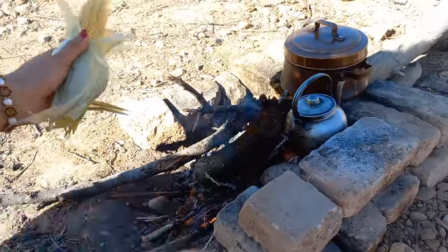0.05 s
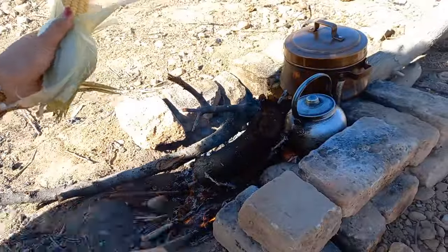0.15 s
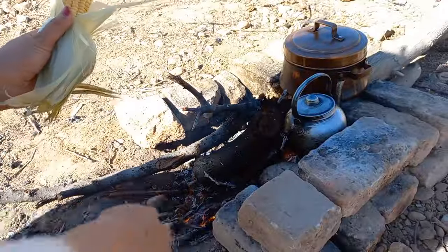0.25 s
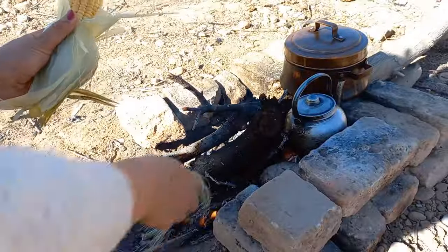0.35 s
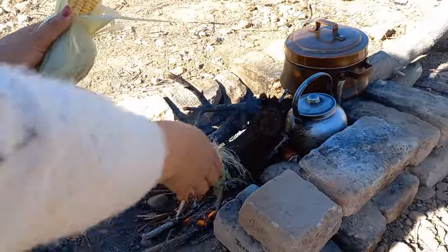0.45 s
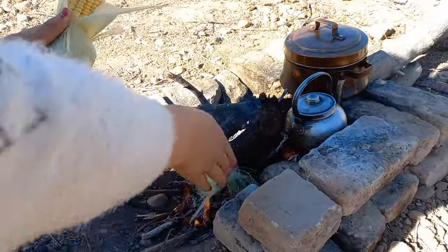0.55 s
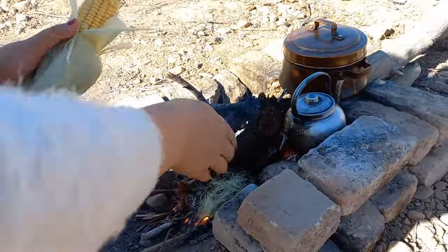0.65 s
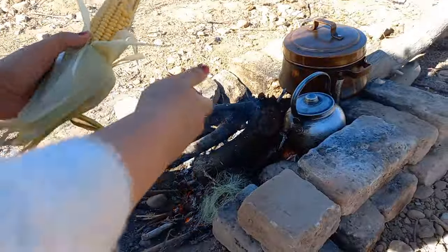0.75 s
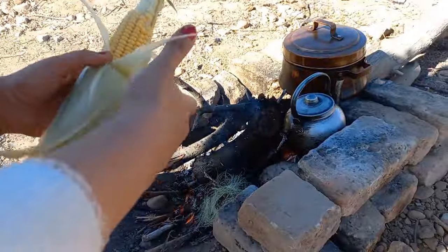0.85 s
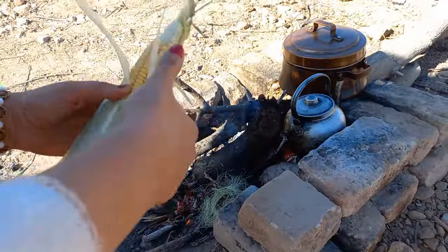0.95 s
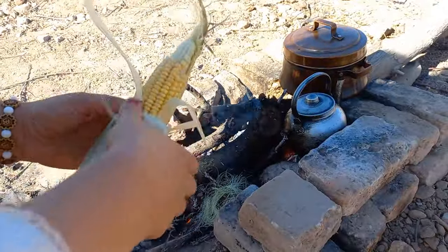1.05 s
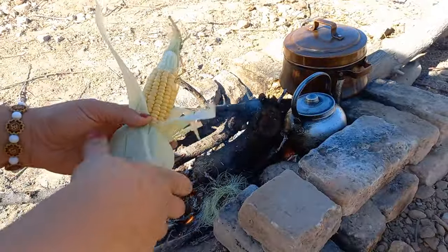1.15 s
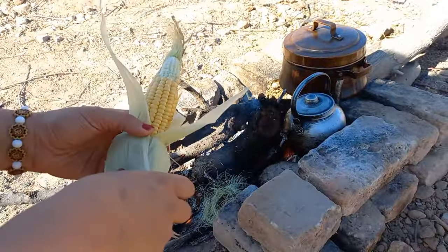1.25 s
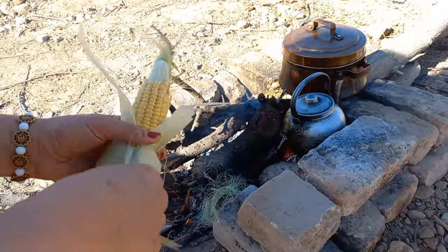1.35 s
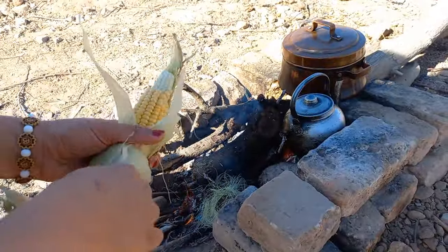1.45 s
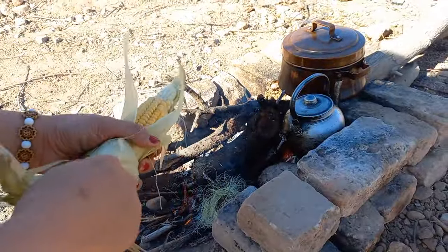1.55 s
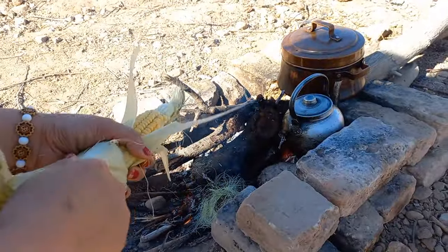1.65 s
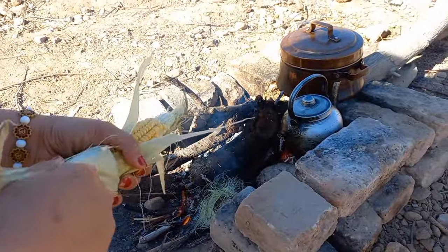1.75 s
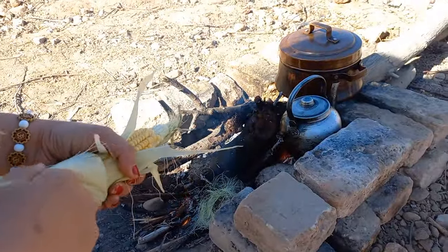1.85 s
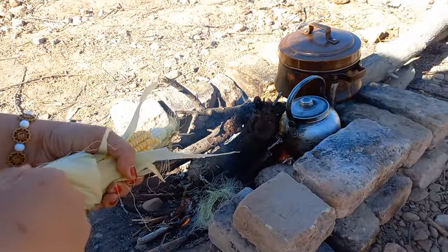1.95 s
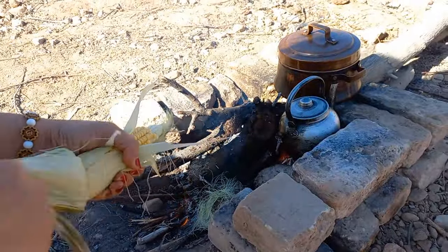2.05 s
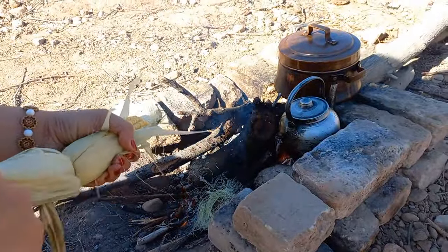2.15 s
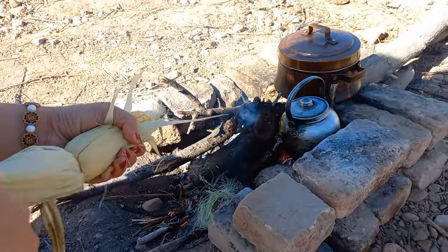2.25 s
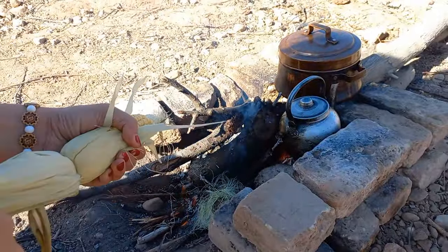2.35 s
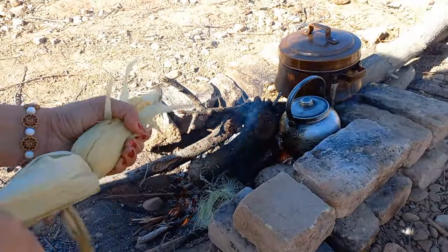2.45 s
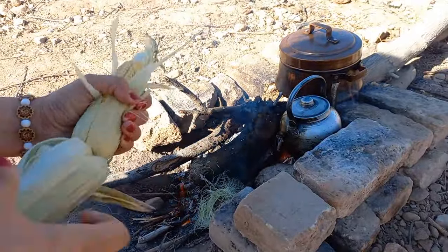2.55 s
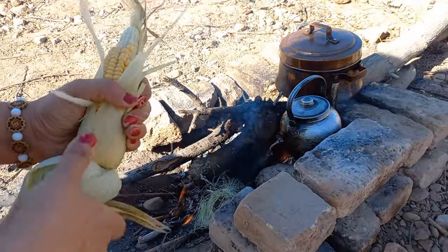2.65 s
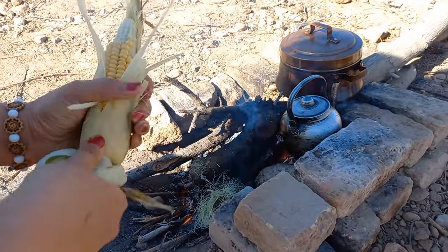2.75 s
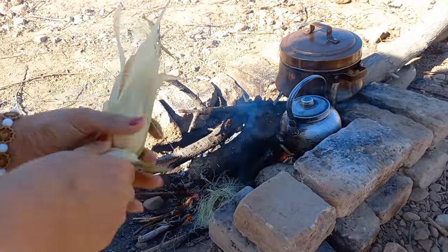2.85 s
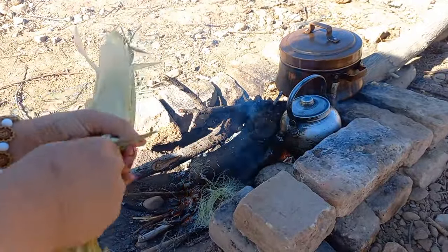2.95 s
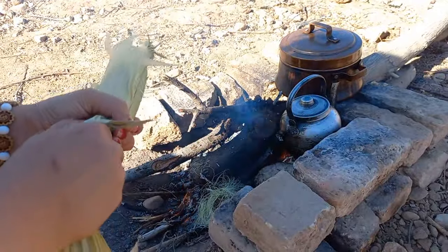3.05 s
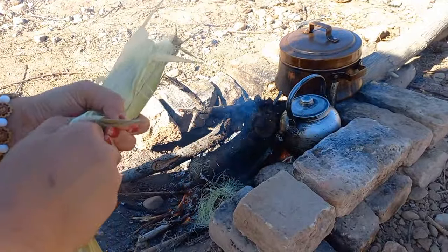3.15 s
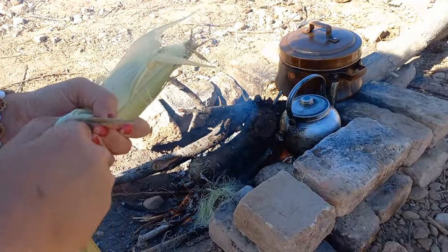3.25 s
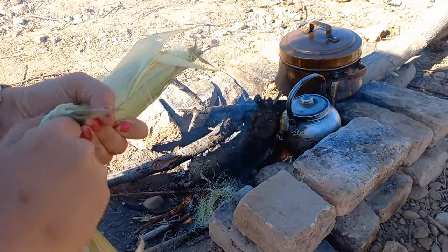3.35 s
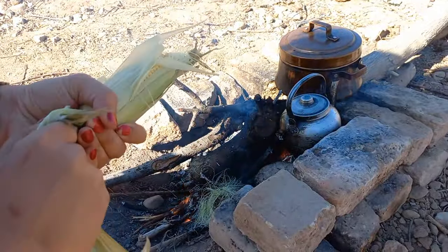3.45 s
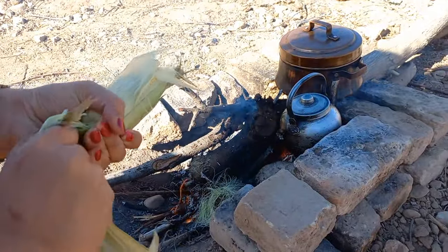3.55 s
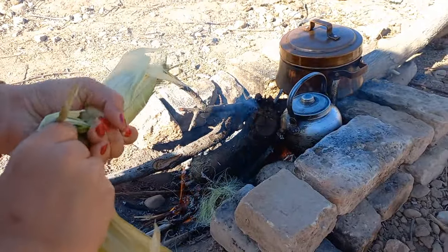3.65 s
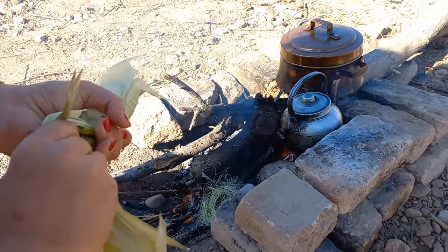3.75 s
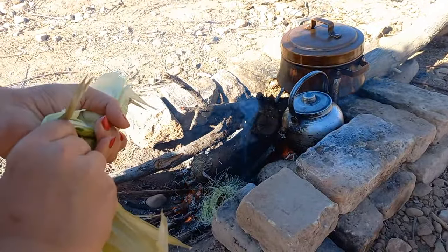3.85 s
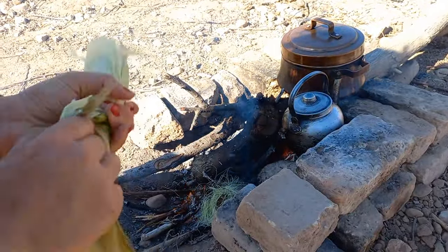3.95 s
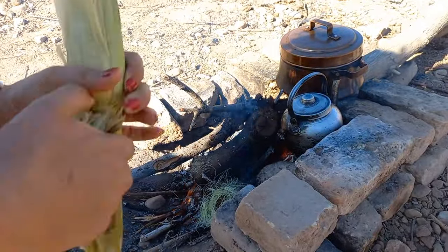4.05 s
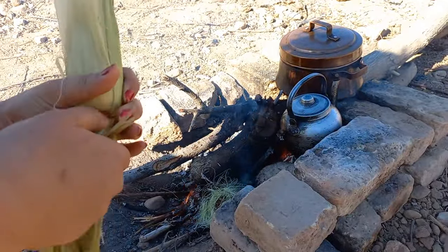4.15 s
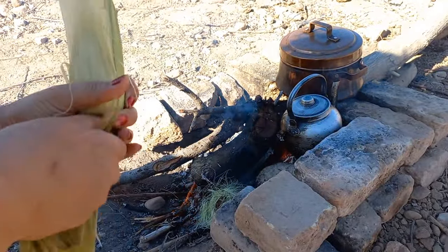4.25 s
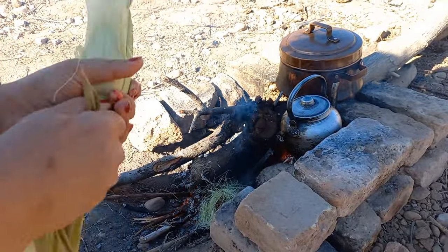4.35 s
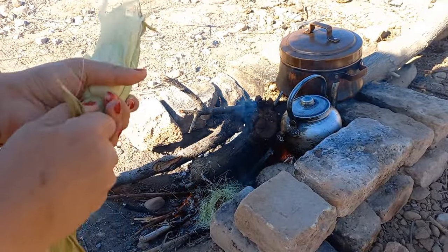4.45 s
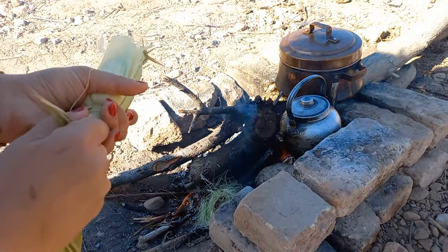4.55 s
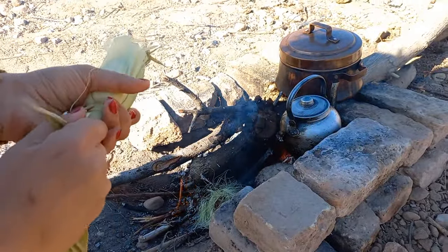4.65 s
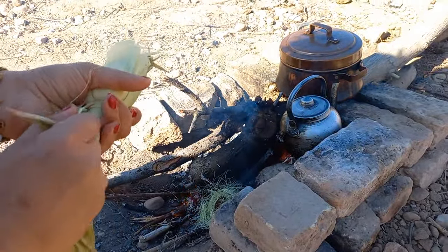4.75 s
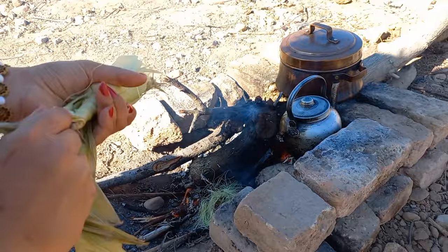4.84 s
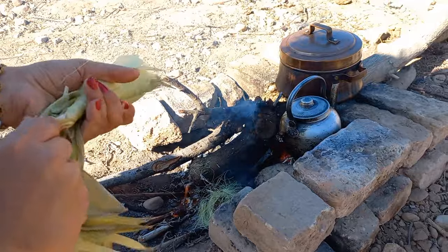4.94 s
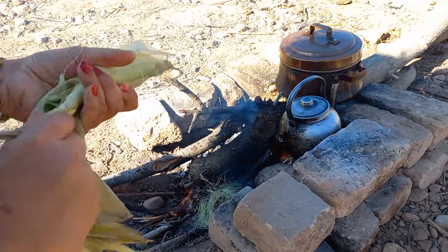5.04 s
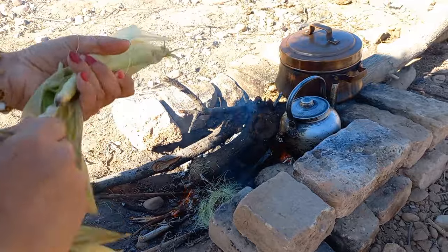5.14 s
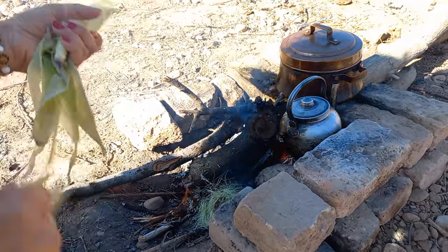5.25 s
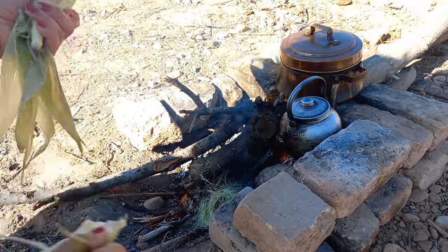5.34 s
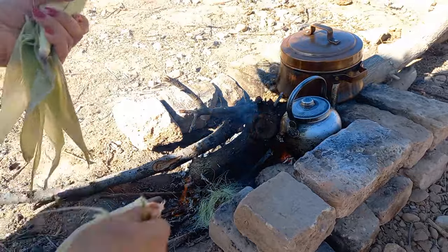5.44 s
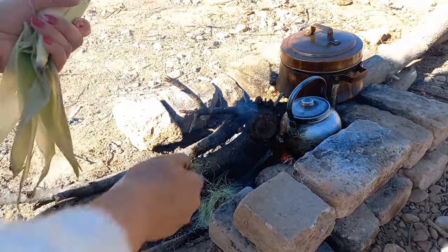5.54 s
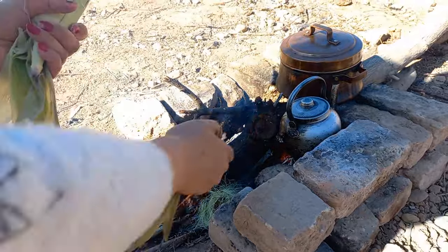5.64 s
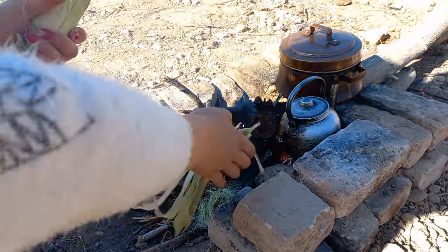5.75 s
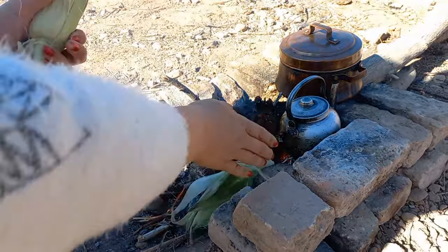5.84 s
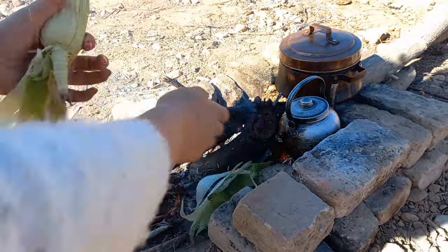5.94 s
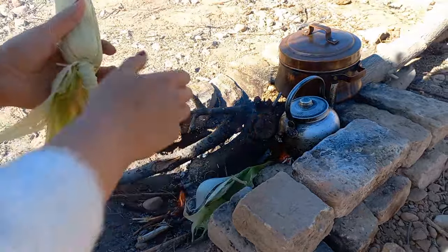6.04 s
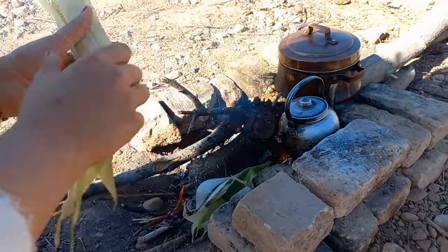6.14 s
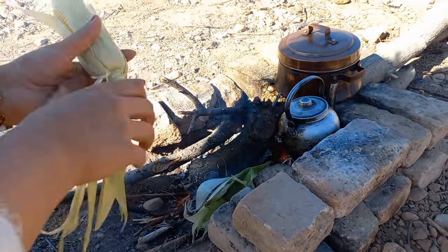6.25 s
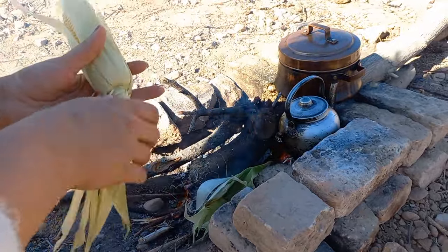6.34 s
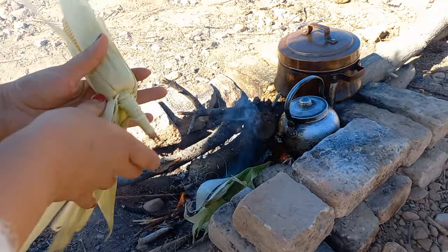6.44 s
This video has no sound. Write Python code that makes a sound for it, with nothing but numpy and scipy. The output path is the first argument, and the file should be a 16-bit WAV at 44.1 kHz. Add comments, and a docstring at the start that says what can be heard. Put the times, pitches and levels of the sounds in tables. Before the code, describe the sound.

Outdoors, very close and to the left, hands strip fresh husks from a corn cob. From 0 to 1.6 s there is only faint, papery rustling with a couple of barely audible dull knocks. Around 2.0 to 2.35 s a thick leaf rips away, crunchy and dense, with bright snaps. Rustling and small ticks continue, with a sharp snap near 3.05 s, a duller crack near 3.28 s, and a tight burst of very sharp cracks at 3.45 to 3.52 s. Lighter crackles follow until a rip at 4.2 s, a run of lower, woody snaps at 4.4 to 4.5 s, and the strongest crack and tear at 4.75 to 4.85 s. Another crisp tear comes at 5.05 to 5.2 s. Then it quiets: soft rustles near 5.85 s and sparse ticks to about 6.5 s. Faint, swelling low air rumble and thin hiss lie beneath, with almost no reverberation.

```python
"""Hands strip fresh husks off a corn cob outdoors, close by and to the left of a camera. Single leaf fibres
snap as short noisy rings with a bright tick, some with a dull low body, amid dull knocks. Rips and rustles are
dense random grains; cob and grip resonate, and the ground returns a faint scatter. Behind them lies open air
with a faint hiss; a low rumble swells under it, partly with the bass of the rips and pulls, all built from
random spectra. The left microphone hears the hands first; the right one lies in the shade of the camera body."""
import sys
import numpy as np
from scipy import signal
from scipy.fft import rfft, irfft, next_fast_len
from scipy.io import wavfile
from scipy.ndimage import uniform_filter1d

SR = 44100
rng = np.random.default_rng(int(sys.argv[2]) if len(sys.argv) > 2 else 0)


def log_audio(samples):
    """Write samples as a 16-bit WAV file to the path given in sys.argv[1]."""
    # one column per channel
    frames = np.atleast_2d(samples).T
    # limit to full scale, then quantise
    limited = np.clip(frames, -1, 1)
    pcm = np.round(limited * 32767).astype(np.int16)
    wavfile.write(sys.argv[1], SR, pcm)


N = 286650  # length in samples, 6.5 s
TAPS = 1024  # length of each grain and spectrum in samples
LEAD_S = 0.005  # room before each snap for its rise

# colour of the hand sounds as heard: a dip near 8 kHz, bright to 15 kHz, little above 16 kHz:
# f/Hz, level/dB
HAND_COLOUR = [(3000, 2), (6200, 5.5), (7200, -0.5), (8100, -8), (9500, -3.5), (13000, 1), (15500, -2.5),
               (15950, -13.5), (16300, -25.5), (16900, -53.5)]
# delay of the right microphone behind the left: f/Hz, delay/s
LAG = [(400, 0.00041), (900, 0.00021), (1500, 0.00036), (3000, .00039)]


def gain_of(db):
    """Decibels to an amplitude factor."""
    return 10 ** (np.asarray(db) / 20)


def evened(x):
    """Scales to rms 1."""
    return x / np.sqrt(np.mean(x ** 2) + 1e-20)


def read(points, hz):
    """Reads a spectrum table on a log-frequency axis."""
    f, value = np.transpose(points)
    return np.interp(np.log(hz + 1), np.log(f + 1), value)


def add(mix, s, sound):
    """Mixes a two-channel sound in at second s."""
    part = mix[:, round(s * SR):][:, :sound.shape[1]]
    part += sound[:, :part.shape[1]]


def causal(points):
    """Minimum-phase impulse response of a dB table."""
    hz = abs(np.fft.fftfreq(TAPS, 1 / SR))
    log_gain = np.log(gain_of(read(points, hz)))
    spectrum = np.exp(np.conj(signal.hilbert(log_gain)))
    return np.fft.ifft(spectrum).real[:TAPS // 2]


def above(hz, edge_hz):
    """Soft crossover gain: towards 0 under the edge, towards 1 over it."""
    return 1 / np.sqrt(1 + (edge_hz / (hz + 1)) ** 6)


def resonate(x, hz, width_hz):
    """A moving resonance: shifts the curve hz down to zero, smooths, and shifts back."""
    turn = np.exp(2j * np.pi * np.cumsum(hz) / SR)
    r = np.exp(-np.pi * width_hz / SR)
    return 2 * (turn * signal.lfilter([1 - r], [1, -r], x / turn)).real


def ports(sound, noise, scatter_t60=0.015):
    """Left hears the sound as it is; right hears it late, shaded and partly scattered off hands and camera."""
    # right microphone over the left: f/Hz, level/dB
    shade = [(200, -4), (700, -2), (1200, -2), (1800, 2.5), (3000, -2.5), (5000, -9.5), (6200, -17.5),
             (7200, -24), (8500, -8.5), (12000, -8.5), (15000, -12)]
    # amplitude share that reaches the right unscattered: f/Hz, share/0-1
    unscattered = [(300, 0.7), (800, 0.99), (1500, 0.78), (3000, 0), (6000, 0), (12000, 0.2)]
    hz, t = np.fft.rfftfreq(TAPS, 1 / SR), np.arange(TAPS) / SR
    scatter = noise * gain_of(-60 * t / scatter_t60)
    direct = np.clip(read(unscattered, hz), 0, 1)
    path = direct + np.sqrt(1 - direct ** 2) * rfft(scatter / np.linalg.norm(scatter))
    delay = np.exp(-2j * np.pi * hz * read(LAG, hz))
    path = path * gain_of(read(shade, hz)) * delay
    return np.array([sound, irfft(rfft(sound) * path)])


def snap(hz, tick_db, t60, noise, cycles=39.0, skirt_db=0.0, width=0.89, low_hz=1030.0):
    """A fibre frays, then lets go: a brief ring in a noisy skirt around its pitch, with a bright tick."""
    t, f = np.arange(TAPS) / SR - LEAD_S, np.fft.rfftfreq(TAPS, 1 / SR)
    t60 = max(t60, 0.0015)
    fray_s = 0.0001 + 0.027 * t60  # time for the last 12 dB of the rise
    shape = gain_of(np.where(t < 0, 12 * t / fray_s, -60 * t / t60))
    # the ring dies by a further 60 dB in this many cycles
    ring = np.sin(2 * np.pi * hz * t) * shape * gain_of(-60 * abs(t) * hz / cycles)
    burst = rfft(noise * shape)
    bright = above(f, 8000)
    near_pitch = 1 / np.sqrt(1 + (np.log((f + 1) / hz) / width) ** 4)
    skirt = irfft(burst * near_pitch * (1 - bright))
    ring = ring / np.linalg.norm(ring) + gain_of(skirt_db) * skirt / np.linalg.norm(skirt)
    tick = irfft(burst * bright)
    sound = ring / np.linalg.norm(ring) + gain_of(tick_db) * tick / np.linalg.norm(tick)
    # a thin fibre moves no bass
    b, a = signal.butter(4, min(low_hz, 0.54 * hz), "high", fs=SR)
    sound = signal.lfilter(b, a, sound)
    return sound / abs(sound).max()


def snaps():
    """The loud single fibres, each with its own pitch, tick and decay."""
    # fibres that break, ahead of the hand colour:
    # t/s, peak level/dB, ring f/Hz, tick over ring level/dB (before the bass cut), t60/s (1.5 ms at least)
    fibres = [(1.696, -38, 6100, -1, 0.012), (1.7948, -32, 6420, 12, 0.0025), (1.824, -29, 6700, 0, 0.053),
              (2.0078, -20.5, 6040, 6, 0.021), (2.1162, -9, 3700, -2, 0.0089),
              (2.1354, -17, 2130, 3, 0.0058), (2.1477, -17, 2200, 2, 0.0044),
              (2.2404, -18.5, 5830, 5.5, 0.0031), (2.2669, -16, 2730, 3.5, 0.0078),
              (2.275, -20, 6890, 11, .005), (2.307, -15, 5200, -4.5, .0086), (2.3251, -23, 3200, 4, 0.011),
              (2.3464, -25, 2570, .5, 0.012), (2.679, -32.5, 4570, 2, .03),
              (2.7401, -30.5, 1440, -19, 0.015), (2.801, -23.5, 1350, -8, 0.018),
              (2.8806, -23.5, 3460, 4.5, 0.0025), (2.9738, -28.5, 3870, -5.5, 0.0035),
              (2.985, -31.5, 4350, -15, 0.0026), (3.04, -38, 2620, -15, .006),
              (3.0541, -7, 3300, -3.5, 0.0061), (3.088, -31, 4540, 2, .0066), (3.105, -29, 6100, 9, .0024),
              (3.126, -41, 1820, -12, 0.0073), (3.1304, -32, 5210, 10, 0.0016),
              (3.214, -26, 5670, 20, .005), (3.22, -24, 1450, 10, 0.008), (3.232, -17.5, 5070, 16, 0.0022),
              (3.2424, -16.5, 5650, -8.5, .002), (3.2471, -15, 3540, 5.5, 0.0094),
              (3.2622, -23.5, 5700, -8, 0.0037), (3.266, -19, 3590, -11, .006),
              (3.273, -17.5, 3560, -6, .006), (3.2829, -7.5, 1400, -11, 0.0097),
              (3.316, -20.5, 1570, 5, .007), (3.33, -26, 6750, 2, 0.014), (3.3836, -26, 6360, 11, 0.0022),
              (3.3948, -28.5, 3750, 0, .0039), (3.4253, -26, 6800, -4, 0.0043),
              (3.4539, -15.5, 5150, 5.5, .004), (3.4605, -22.5, 1730, -22, .0061),
              (3.4763, -6.5, 5500, -1, 0.004), (3.48, -20, 3800, 18, .006),
              (3.4842, -10.5, 6800, -3, 0.0061), (3.4921, -7, 3460, 13, .0042),
              (3.5053, -6, 3530, 9.5, .003), (3.5102, -10.5, 6460, 10, .0069),
              (3.516, -16.5, 3160, 4.5, 0.0058), (3.522, -16.5, 2240, 8, .012),
              (3.6108, -36.5, 6100, 10, 0.013), (3.6744, -30.5, 5770, 22, .003),
              (3.7029, -29, 4260, 16, .002), (3.712, -23.5, 4400, -.5, 0.0038),
              (3.746, -22, 2080, -16, 0.0083), (3.8086, -39.5, 3150, -2, 0.0067),
              (3.9143, -28, 2690, -24, 0.008), (3.921, -28, 1970, -12, 0.0013),
              (3.9364, -37, 1470, -14, .005), (3.9522, -35, 1350, -12, 0.0099),
              (3.9569, -30, 1860, -16, 0.012), (4.1208, -35, 1480, 4, .04), (4.24, -21, 1320, -11, 0.0087),
              (4.2795, -20.5, 1360, -4, 0.0033), (4.2956, -31, 3200, -7, 0.0092),
              (4.3352, -25.5, 1720, -.5, 0.008), (4.3452, -20, 4200, -1, .0078),
              (4.366, -16.5, 4000, -2, 0.0013), (4.376, -25.5, 4160, 3, 0.0023),
              (4.3964, -19, 3190, -7, 0.0028), (4.416, -19.5, 2710, -11, 0.0045),
              (4.4199, -10, 2500, -11, 0.0034), (4.4219, -10.5, 3295, -4, 0.013),
              (4.4271, -11, 2050, -7.5, 0.018), (4.442, -16, 2073, -9.5, 0.0089),
              (4.4571, -7, 1930, -29, 0.0063), (4.4745, -10, 1560, -22, 0.0098),
              (4.4946, -33, 5990, -1, .01), (4.5094, -30, 3000, -7, 0.0042), (4.6117, -32, 6150, 4, .011),
              (4.6693, -27.5, 2710, -16, 0.012), (4.6715, -33.5, 1480, -18, .015),
              (4.698, -34, 3420, 4.5, .005), (4.7075, -35, 5790, -6.5, .005),
              (4.7192, -26.5, 2817, 1, 0.007), (4.7431, -7.5, 1460, -5.5, 0.018),
              (4.7576, -14, 2715, -14, 0.011), (4.787, -0.5, 1950, 5.5, 0.0057),
              (4.955, -25, 2000, 1.5, .0045), (5.0167, -22.5, 3870, -8, 0.0042),
              (5.0347, -29, 3830, -12, 0.013), (5.0586, -15, 5700, 9, 0.01), (5.072, -17.5, 3360, 2, 0.033),
              (5.1047, -16, 6600, 6, 0.0065), (5.1101, -15, 5640, 10, 0.023),
              (5.125, -6.5, 1430, 10, 0.0018), (5.2724, -30.5, 3300, -8, 0.039),
              (5.5482, -37, 3790, 11, 0.011), (5.42, -44, 6500, 13, .004), (5.961, -48, 2510, -24, 0.034),
              (6.204, -35, 4400, 7, 0.0021), (6.235, -41, 6370, 13, 0.008), (6.2515, -36, 5000, 23, .005),
              (6.3127, -29.5, 5930, 21, 0.0018)]
    out = np.zeros((2, N))
    for s, db, *fibre in fibres:
        snap_noise, scatter_noise = rng.standard_normal((2, TAPS))
        add(out, s - LEAD_S, gain_of(db) * ports(snap(*fibre, snap_noise), scatter_noise))
    return out


def bumps():
    """Dull knocks and the low body of some snaps: decaying sines with softened ends."""
    # low thuds, ahead of the hand colour: t/s, level/dB at the start of the decay, ring f/Hz, t60/s
    thuds = [(0.784, -45, 280, 0.015), (0.992, -50.5, 310, 0.032), (2.136, -36, 750, .012),
             (2.148, -31, 900, .012), (2.308, -42.5, 734, 0.014), (2.735, -33.5, 460, 0.022),
             (2.797, -35.5, 850, 0.024), (2.825, -35, 282, 0.027), (3.398, -27, 170, 0.0079),
             (3.884, -44.5, 300, 0.016), (4.256, -23.5, 600, 0.011), (4.279, -37, 700, .012),
             (4.296, -38, 640, .02), (6.166, -51, 916, 0.034)]
    out, t = np.zeros((2, N)), np.arange(TAPS) / SR
    for s, db, hz, t60 in thuds:
        thud = np.sin(2 * np.pi * hz * t) * gain_of(-60 * t / t60) * signal.windows.tukey(TAPS, 0.15)
        add(out, s, gain_of(db) * ports(thud, rng.standard_normal(TAPS)))
    return out


def fibre_clicks(spread_db, per_s=9000.0, clump=0.98, clump_s=0.008):
    """Thousands of small breaks a second, their sizes rising and falling in clumps."""
    clumps = evened(signal.oaconvolve(rng.standard_normal(N), np.hanning(round(clump_s * SR)), "same"))
    chance = np.minimum(rng.exponential(1, N), 4)
    sizes = gain_of(np.clip(spread_db, 0, 4) * (chance + clump * clumps))
    clicks = sizes * rng.choice([-1.0, 1.0], N) * (rng.random(N) < per_s / SR)
    # even out the local power, so that the pull sets it whatever the sizes
    return clicks / np.sqrt(uniform_filter1d(clicks ** 2, size=900) + 1e-9)


def tearing(pull_db, flap_db, bright_db, spread_db, flap_hz,
            count=24, grain_t60=0.0047, ring_db=-8.5, cycles=11.0):
    """Small fibres break, each in one of many patches of leaf with its own pitch; the loose leaf flaps below."""
    # spectrum of tearing leaf: f/Hz, level/dB
    leaf = [(100, -30.5), (250, -3.5), (430, -12), (700, -6.5), (1150, -3), (1700, -1), (2500, 1),
            (3700, 1.5), (5000, 4), (7000, 6), (16000, 7)]
    clicks = fibre_clicks(spread_db)
    patch, t, size = rng.integers(0, count, N), np.arange(TAPS) / SR, next_fast_len(N + TAPS)
    z = np.zeros((2, size // 2 + 1), complex)
    for k, ring_hz in enumerate(np.geomspace(500.0, 6500.0, count)):
        grain_noise, scatter_noise = rng.standard_normal((2, TAPS))
        grain = grain_noise * gain_of(-60 * t / grain_t60)
        ring = np.sin(2 * np.pi * ring_hz * t) * gain_of(-60 * t * ring_hz / cycles)
        grain = grain / np.linalg.norm(grain) + gain_of(ring_db) * ring / np.linalg.norm(ring)
        z += rfft(clicks * (patch == k), size) * rfft(ports(grain, scatter_noise), size)
    f = np.fft.rfftfreq(size, 1 / SR)
    z *= rfft(causal(leaf), size) * rfft(causal(HAND_COLOUR), size)
    # split into five bands at these edges in Hz
    steps = [1] + [above(f, edge) for edge in (1100, 2500, 5000, 8000)] + [0]
    bands = [irfft(z * (a - b), size)[:, :N] for a, b in zip(steps, steps[1:])]
    flap, coarse, middle, fine, crisp = bands
    boom = resonate(resonate(flap, flap_hz, 480), flap_hz, 480)
    flap = boom + gain_of(-9) * flap
    octaves = (-1, 0, 0.8, 1.7)  # distance of each upper band from the middle one
    fibres = sum(gain_of(o * bright_db) * x for o, x in zip(octaves, (coarse, middle, fine, crisp)))
    return gain_of(pull_db) * (fibres / middle[0].std() + gain_of(flap_db) * flap / flap[0].std())


def move(t, bend, peak, rise, hold, fall):
    """Drop in dB around the peak of one movement, and how far it has gone after the peak (0-1)."""
    outside = np.maximum(peak - t, 0) / rise + np.maximum(t - peak - hold, 0) / fall
    return -20 * outside ** bend, np.clip((t - peak) / (hold + fall), 0, 1)


def handwork():
    """Pulls add up in power, and the power weights the flap, brightness, spread and flap pitch."""
    # In these tables rise and fall span 20 dB, flap level is over the pull, brightness is dB per octave,
    # and spread is that of fibre sizes, which the clicks hold to 0-4 dB.
    # leaves ripped off: peak t/s, rise t/s, hold t/s, fall t/s, pull level/dB, flap level/dB at the peak,
    # brightness at the peak, brightness once free, spread/dB, flap f/Hz at the peak, flap f/Hz once free
    rips = [(2.024, 0.0057, .02, .04, -30, -1, -6, -6, 2, 713, 796),
            (2.065, .035, 0.0047, .055, -25, 1.5, -8.5, -7.5, 2.5, 830, 740),
            (3.272, 0.041, .003, 0.042, -49.5, -10, -11.5, -7, 1.5, 655, 640),
            (3.477, 0.018, 0.0025, 0.026, -36.5, -17.5, -9, -6, 4.5, 643, 654),
            (4.21, .04, .008, 0.042, -37, -4.5, -6, -3.5, 2.5, 720, 682),
            (4.456, 0.046, 0.01, 0.03, -32.5, -10, -4.5, -5.5, 2.5, 897, 900),
            (4.743, 0.0014, 0.00091, 0.0085, -28.5, -19, -0.5, -12, 2.8, 876, 879),
            (4.795, 0.011, 0.024, 0.066, -26, -6, -8.5, -3.5, 2, 669.5, 266.4),
            (5.053, .012, .02, .05, -41, -4.5, -5.5, -3.5, 3, 533, 624),
            (5.108, 0.0091, 0.06, 0.13, -42, -10, -3, -1, 2.5, 682, 280)]
    # leaves rubbed or shifted in the fingers: peak t/s, rise t/s, fall t/s, pull level/dB,
    # flap level/dB, brightness, spread/dB
    rustles = [(.05, .3, .17, -65, -11, -4.5, 0.5), (.41, 0.33, 0.12, -75.5, -5, -4, 1),
               (0.646, 0.19, .4, -83.5, -1, 7, 5), (.842, .14, 0.1, -68, -7, -4, -0.2),
               (1.069, 0.14, 0.29, -62.5, -14, -1.2, 2.5), (1.262, .02, .15, -61.5, -4, 1.5, 1.5),
               (1.324, 0.095, .09, -54.5, -7, -2.5, 2), (1.49, 0.35, 0.15, -62, -10, -2, -0.3),
               (1.63, 0.11, 0.34, -63.5, -10, -4, 3.5), (1.829, 0.027, .12, -57, -8, -3.5, -0.5),
               (2.012, .07, .03, -52, -11.5, -1.5, 1.5), (2.18, .05, .3, -62.5, -3, -5, 0),
               (2.29, 0.21, 0.18, -56.5, -15, -1, 4), (2.481, 0.084, 0.092, -53.5, -13.5, -2.5, 1.5),
               (2.6, 0.046, 0.68, -55, -8.5, -1, 4), (2.75, 0.12, 0.2, -52, 3.5, -9.5, -2),
               (2.865, .25, 0.079, -56.5, -16, 0.3, 5), (2.977, .3, 0.13, -58.5, -12, -6.5, 3.5),
               (3.055, .1, 0.18, -59.5, -9, -5.5, 5.5), (3.322, 0.064, .03, -53, -9, -10, 1),
               (3.44, 0.18, 0.12, -65.5, -2, -2, 0.5), (3.535, 0.21, .03, -55, -10.5, -5, 9.5),
               (3.73, 0.71, .25, -66, -14, -0.9, 3.5), (3.93, .1, .2, -57, -9, -4.5, 4),
               (4., 0.079, 0.079, -53, -14, -2, 1.5), (4.14, 0.1, .2, -54.5, -19, -3, 6),
               (4.29, .15, 0.2, -53, 0.5, -4, -1.2), (4.53, .1, 0.089, -64.5, -4, -6, 1.2),
               (4.64, 0.092, 1, -64.5, -15.5, -3.5, 2.5), (4.94, 0.35, 0.12, -59, -5.5, -4.5, 2.5),
               (5.022, .012, .15, -50.5, -6, -3.5, 3.5), (5.48, 0.66, .4, -69, -10, -1.6, 1.5),
               (5.7, 0.34, 0.13, -78, 2, 12, 2), (5.863, 0.034, 0.085, -57.5, -3, -2.5, 1.8),
               (5.961, 0.045, 0.068, -65, -12, -2.5, 6), (6.16, 0.032, 0.076, -64.5, 2, -1.5, -1.5),
               (6.32, .25, .22, -74, -4.5, 1.5, 1), (6.459, .04, .4, -60, -7, 0.1, 6)]
    # still hands: pull level/dB, flap level/dB, brightness, spread/dB
    rest = (-79.5, 4.5, -1, 2)
    # pitch of the loose leaf between rips: t/s, f/Hz
    loose = [(0, 590), (1.6, 616), (1.85, 765), (2.3, 651), (2.6, 396), (2.76, 814), (2.9, 422.4),
             (3.6, 598.5), (4.1, 712), (4.38, 803), (4.6, 555), (5.5, 543), (6.17, 803), (6.5, 602)]
    rip_bend, rustle_bend = 1.93, 1.143  # rips have rounder shoulders
    flap_grows_db = 4  # the flap gains on the pull as a rip lets go
    t = np.arange(0, N + 16, 16) / SR  # control curves, one point in 16 samples
    loose_hz = np.interp(t, *np.transpose(loose))
    rows = [[x + 0 * t for x in (*rest, loose_hz)]]
    for peak, rise, fall, db, *colour in rustles:
        drop_db, _ = move(t, rustle_bend, peak, rise, 0, fall)
        rows.append([db + drop_db] + [x + 0 * t for x in (*colour, loose_hz)])
    for peak, rise, hold, fall, db, flap_db, held_db, free_db, spread_db, held_hz, free_hz in rips:
        drop_db, gone = move(t, rip_bend, peak, rise, hold, fall)
        bright_db = held_db + (free_db - held_db) * gone
        flap_hz = held_hz * (free_hz / held_hz) ** gone
        rows.append([db + drop_db, flap_db + flap_grows_db * gone, bright_db, spread_db + 0 * t, flap_hz])
    rows = np.array(rows)
    power = gain_of(2 * np.maximum(rows[:, 0], -200))
    total = power.sum(0)
    colours = (np.moveaxis(rows[:, 1:], 1, 0) * power).sum(1) / total
    mixed = [10 * np.log10(total), *colours]
    return [np.interp(np.arange(N) / SR, t, c) for c in mixed]


def held(x):
    """The cob and the hollow between leaf and palm resonate with whatever the leaves do."""
    # the grip: t/s, hollow f/Hz, gain of the hollow's resonance/dB, gain of the cob's resonance/dB
    grip = [(0, 2800, -37, 0.5), (.7, 2500, -53, 11), (1., 3800, -1, -3), (1.28, 2600, -11, 1),
            (1.55, 3700, -3, 8), (1.85, 3630, 1, 9), (2.05, 2180, -7.5, 11.5), (2.75, 2470, -15.5, 4),
            (3.02, 3330, 4.5, 2), (3.3, 2510, -6.5, -11), (3.9, 2360, 3, 13), (4.25, 2760, -3, 8),
            (4.6, 2490, 1.5, 5), (4.85, 2350, -3, 6.5), (5.15, 2180, 0, -22), (5.19, 3700, 3.5, -14),
            (5.85, 3540, -17, 11), (5.96, 2600, -4, -18), (6.1, 3300, -4, 5), (6.5, 4040, 2, 5.5)]
    s, *columns = np.transpose(grip)
    hollow_hz, hollow_db, cob_db = (np.interp(np.arange(N) / SR, s, c) for c in columns)
    cob = resonate(x, np.full(N, 1453), 114)  # one fixed pitch and its width in Hz
    hollow = resonate(x, hollow_hz, 290)
    return x + gain_of(cob_db) * cob + gain_of(hollow_db) * hollow


def ground(x, t60=0.02, level_db=-18.0):
    """Stones and ground throw back a short, faint scatter: decaying noise from 2 ms on."""
    t = np.arange(SR // 8) / SR
    tail = rng.standard_normal((2, len(t))) * gain_of(-60 * t / t60) * (t > 0.002)
    return gain_of(level_db) * signal.oaconvolve(x, tail / np.linalg.norm(tail[0]), axes=1)[:, :N]


def air(level_db=-62.5, patchy_db=-1.5, rumble_hz=250.3):
    """Open air with a faint hiss, and a lumpy low rumble that also swells with the bass of the rips and pulls,
    as random short-time spectra."""
    # relative spectrum of the air: f/Hz, level/dB
    spectrum = [(15, -89.5), (25, -46), (56, -17.5), (87, 0.5), (149, -8.5), (270, -11), (516, -29),
                (560, -35), (734, -40), (1160, -46), (2110, -34), (2910, -54.5), (7110, -31.5), (8140, -47),
                (16000, -48.5)]
    # likeness of the two microphones: f/Hz, likeness/0-1
    likeness = [(60, 0.86), (300, 1), (1000, .6), (4000, 0.1)]
    # left over right: f/Hz, level/dB
    balance = [(60, 1.5), (180, 0.5), (550, 4.5), (1650, -0.5), (4970, 10.5), (15000, 19)]
    # course of the low rumble, swelling also with the rips and pulls, before the patches and the bass cut: t/s,
    # level/dB
    rumble = [(0, -59.5), (.22, -67.5), (.29, -57), (.5, -66), (.7, -61.5), (1.08, -64.5), (1.38, -57.5),
              (1.72, -67), (2.001, -62.5), (2.11, -53), (2.19, -70), (2.46, -61), (2.59, -65),
              (2.81, -53.5), (2.88, -60.5), (3.24, -66.5), (3.42, -54.5), (3.62, -66), (3.78, -57.5),
              (3.89, -63.5), (3.98, -53.5), (4.13, -61.5), (4.44, -58.5), (4.62, -66.5), (4.85, -57),
              (4.96, -63), (5.18, -54.5), (5.47, -68), (6.12, -59), (6.41, -69.5), (6.46, -54.5),
              (6.5, -70)]
    frames, hz = N // 256 + 5, np.fft.rfftfreq(1024, 1 / SR)
    a, b, c, d, patches = rng.standard_normal((frames, 513, 5)).T
    # smooth the patches of loudness over time and frequency
    patches = evened(uniform_filter1d(uniform_filter1d(patches, 10, 0), 12, 1))
    s, db = np.transpose(rumble)
    swell_db = np.interp(np.arange(frames) * 256 / SR, s, db) - level_db
    same, left = np.clip(read(likeness, hz), 0, 1)[:, None], a + 1j * b
    delay = np.exp(-2j * np.pi * hz * read(LAG, hz))[:, None]
    right = (same * left + np.sqrt(1 - same ** 2) * (c + 1j * d)) * delay
    lean = gain_of(read(balance, hz)[:, None] / 2)
    z = np.array([left * lean, right / lean]) * gain_of(read(spectrum, hz)[:, None])
    z /= np.sqrt(np.mean(signal.istft(z, nperseg=1024, noverlap=768)[1].mean(0) ** 2))
    low = (1 - above(hz, rumble_hz))[:, None]  # only the rumble swells
    z *= gain_of(level_db + patchy_db * patches + low * swell_db)
    return signal.istft(z, nperseg=1024, noverlap=768)[1][:, :N]


def scene():
    """Hands, their scatter off the ground and the open air."""
    single = signal.oaconvolve(snaps() + bumps(), causal(HAND_COLOUR)[None])[:, :N]
    hands = held(tearing(*handwork()) + single)
    return hands + ground(hands) + air()


def record(dry):
    """Cuts the deepest bass, rounds off the highest peaks; nothing sounds above about 17 kHz."""
    thinned = signal.sosfilt(signal.butter(6, 57.0, "high", fs=SR, output="sos"), dry)
    rounded = thinned / (1 + (thinned / 0.93) ** 4) ** (1 / 4)  # never passes 0.93
    band = signal.firwin(511, 16980, window=("kaiser", 9), fs=SR)  # upper edge in Hz
    return signal.oaconvolve(rounded, band[None], "same")


dry = scene()
out = record(dry)
log_audio(out)
```